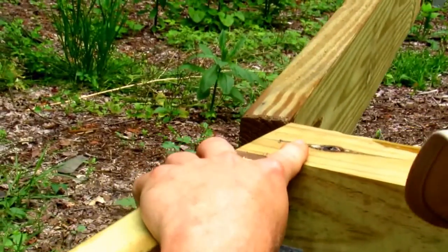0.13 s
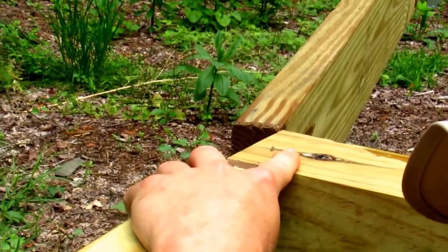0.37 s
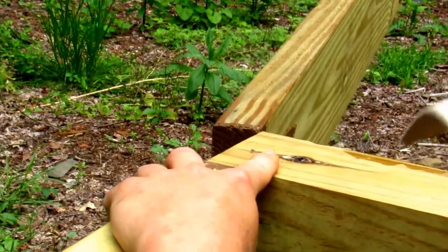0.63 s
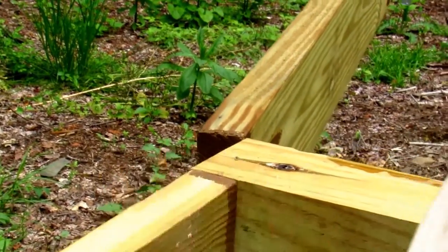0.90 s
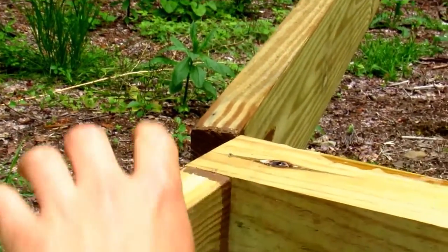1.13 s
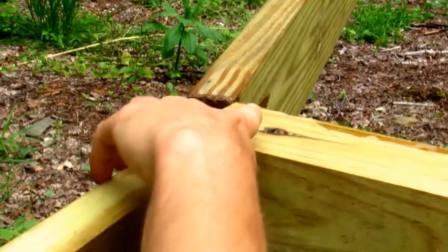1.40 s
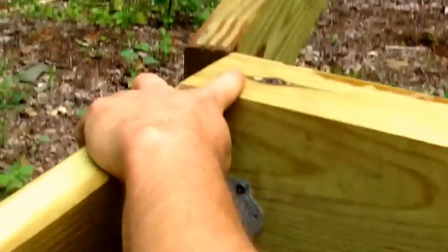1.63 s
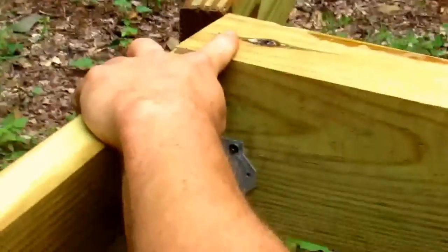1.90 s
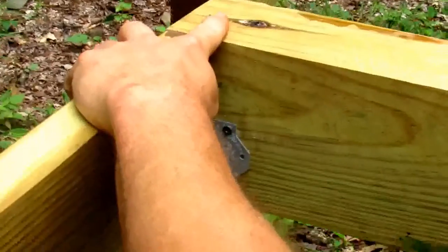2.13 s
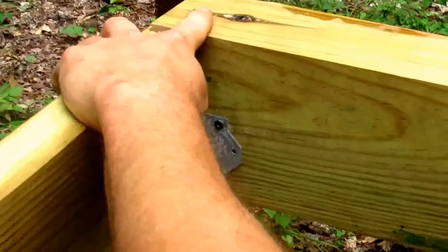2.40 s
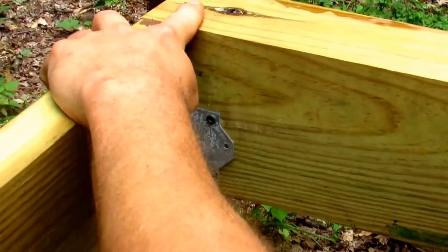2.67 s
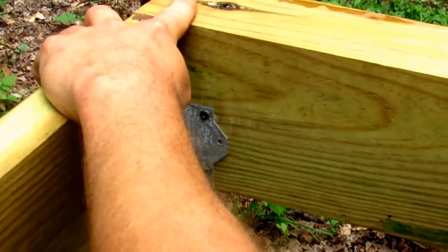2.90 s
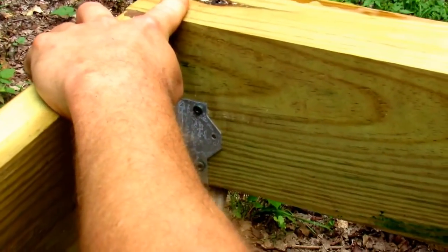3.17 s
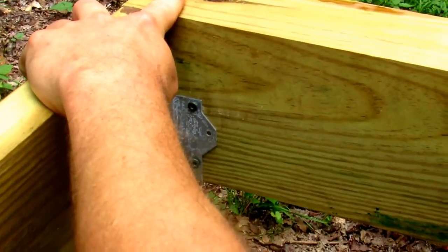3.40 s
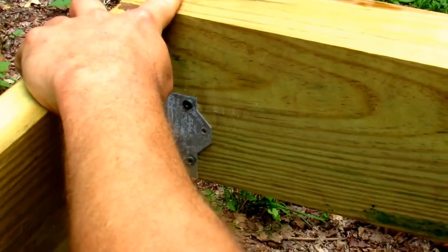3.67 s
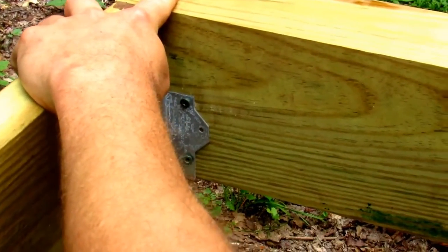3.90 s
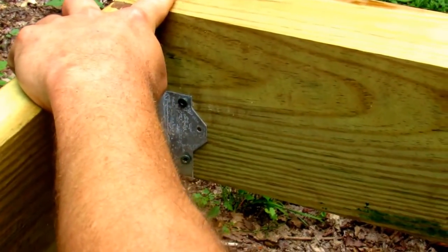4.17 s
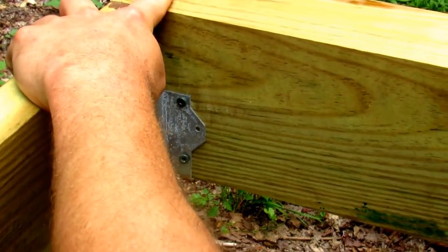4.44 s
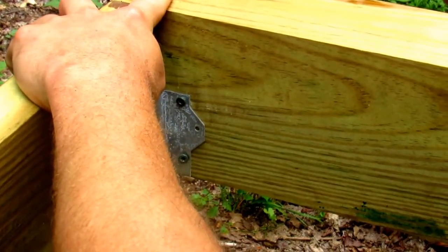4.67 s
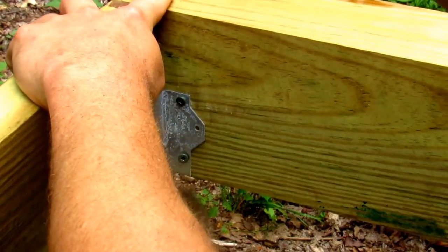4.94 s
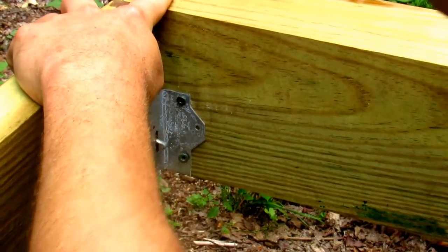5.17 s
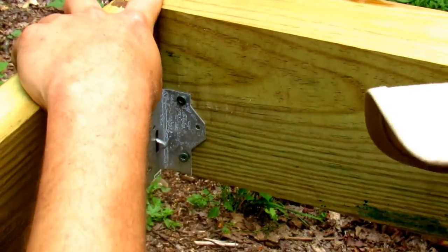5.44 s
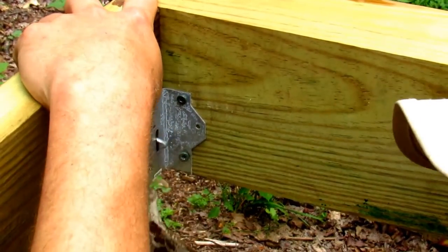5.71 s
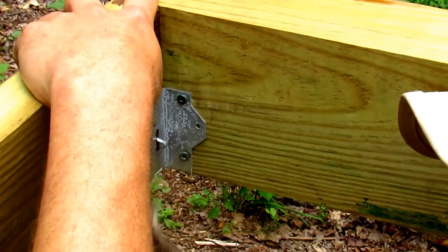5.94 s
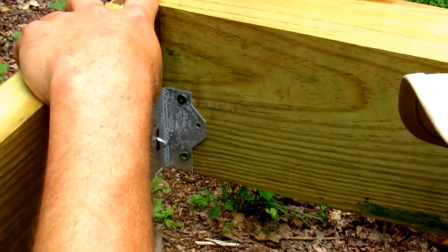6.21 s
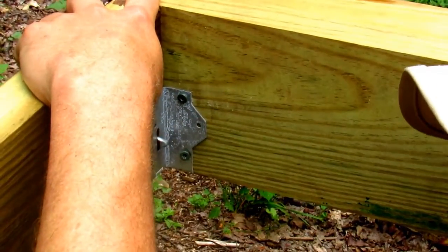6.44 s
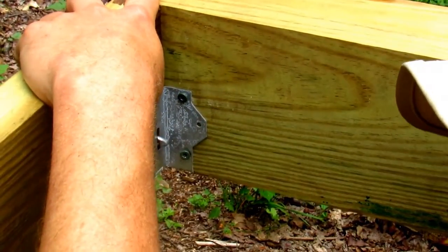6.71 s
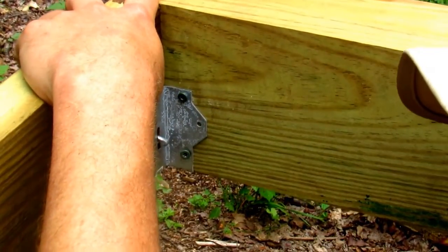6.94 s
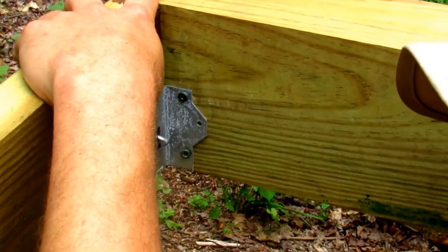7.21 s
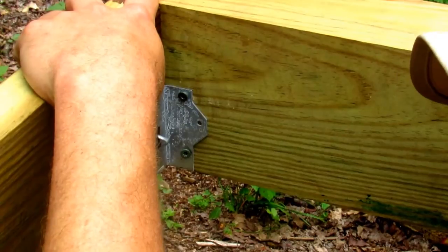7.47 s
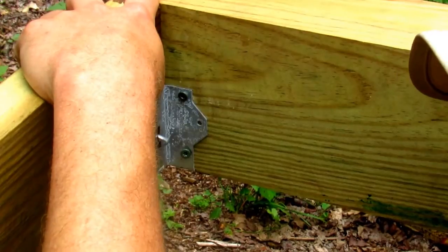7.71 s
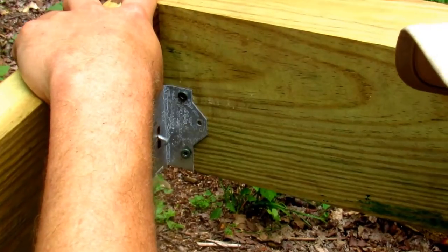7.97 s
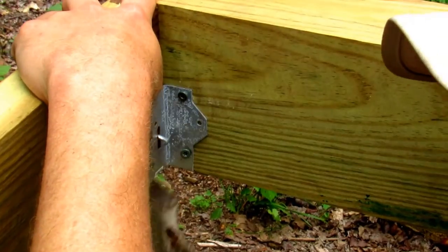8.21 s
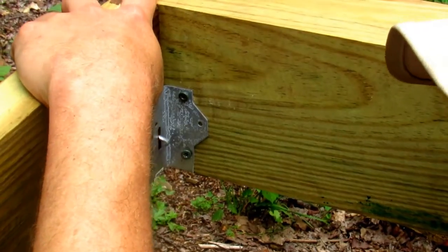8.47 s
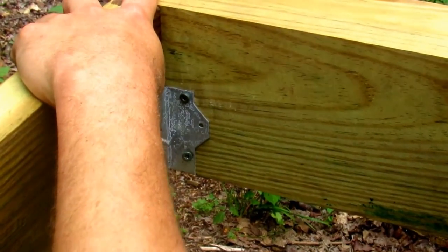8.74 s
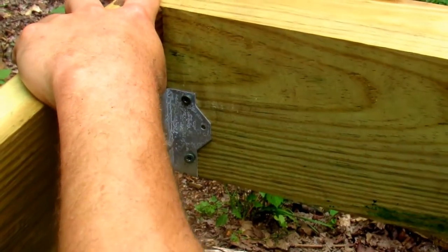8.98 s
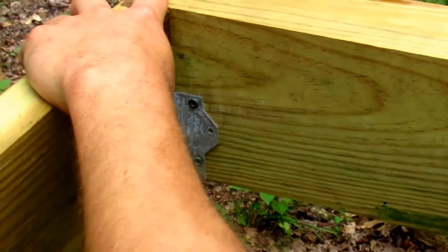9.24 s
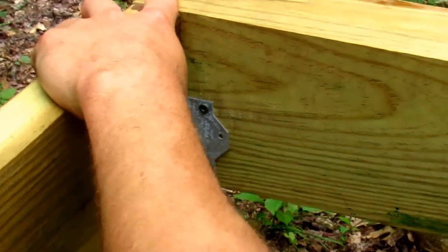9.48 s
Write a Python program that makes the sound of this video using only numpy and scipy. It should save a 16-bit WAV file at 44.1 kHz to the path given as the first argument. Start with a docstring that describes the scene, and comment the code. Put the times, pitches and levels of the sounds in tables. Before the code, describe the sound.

Axe-back blows crack on nail and bracket, wooden boards knocking and steel buzzing, while birds whistle faintly among windy trees.

```python
"""Sharp cracks come first: the back of an axe drives nails through a steel bracket into a timber frame outdoors.
Each blow sets board and steel modes ringing, bursts into noise bands and returns from the trees as a dull tail.
Birds sing further off as wavering near-sines, and a hand rustles as short gated noise.
Wind and hiss are noise bands, the distant hum is resonant noise and the thin whine a sine.
A close stereo pair overloads a little."""
import sys
import numpy as np
from scipy import signal
from scipy.io import wavfile

SR = 44100
rng = np.random.default_rng(int(sys.argv[2]) if len(sys.argv) > 2 else 0)


def field_ratio(decibels):
    """Amplitude ratio for a level in dB (20 dB per decade); scalars and array-likes work."""
    return 10 ** (np.asarray(decibels, dtype=float) / 20)


def wav_out(sig):
    """Save sig, one row per channel (or a flat mono array), as 16-bit PCM at SR to the path in sys.argv[1]."""
    wavfile.write(sys.argv[1], SR, np.round(np.clip(np.atleast_2d(sig).T, -1, 1) * 32767).astype(np.int16))


N = 423791

# hammer blows, relative levels: start_s, thud_db (100-600 Hz), clack_db (700-1800 Hz),
# crack_db (5-16 kHz), free_ring_db of the axe head
BLOWS = [(0.1037, -34.5, -23, -21.5, -63), (0.3709, -23.5, -18.5, -16.5, -37),
         (0.4409, -30.5, -25.5, -28, -60), (2.2914, -39, -23.5, -15, -51.5),
         (2.61, -40.5, -22.5, -15.5, -62), (2.8992, -31.5, -19, -17.5, -53.5),
         (3.187, -29, -18, -15, -59.5), (3.4737, -20.5, -12.5, -11, -51),
         (3.7564, -23, -11.5, -10.5, -54.5), (4.0315, -22.5, -11.5, -12.5, -60),
         (4.3109, -22, -14, -17, -52.5), (4.594, -22, -11.5, -12.5, -56.5),
         (4.8703, -21.5, -13.5, -17, -55), (5.7011, -24.5, -11, -16.5, -56),
         (5.9804, -25.5, -14.5, -23, -60), (6.2639, -23, -20.5, -19.5, -78), (6.55, -22, -18.5, -21.5, -64),
         (6.8303, -22, -17.5, -17, -49), (7.0982, -26, -11.5, -20.5, -63),
         (7.3802, -23, -18.5, -15.5, -56.5), (7.651, -22, -16.5, -19, -59),
         (7.9159, -22.5, -15.5, -19.5, -67.5), (8.189, -23, -28, -26.5, -71),
         (8.448, -23.5, -15, -17.5, -60)]
# the first nail seats, then the second nail begins: start_s
STAGES_S = [3.3, 5.4]


def rms_one(x):
    """Scale a signal to rms 1."""
    return x / np.sqrt(np.mean(x ** 2) + 1e-20)


def at_hz(table, hz):
    """Read the columns of a table on a log-frequency axis."""
    f, *columns = np.transpose(table)
    return [np.interp(np.log(hz), np.log(f), column) for column in columns]


def clicks(s, size):
    """Place an impulse of the given size at each time."""
    out = np.full(N, 1e-18)
    out[np.round(np.asarray(s) * SR).astype(int)] += size
    return out


def dying(x, t60):
    """Turn each impulse into an exponential envelope that falls 60 dB in t60 seconds."""
    return signal.lfilter([1], [1, -field_ratio(-60 / (max(t60, .002) * SR))], x)


def ring(x, hz, t60):
    """A two-pole resonance: a unit click sets a dying sine of height 1 ringing."""
    r = field_ratio(-60 / (t60 * SR))
    w = 2 * np.pi * hz / SR
    return signal.lfilter([0, np.sin(w)], [1, -2 * r * np.cos(w), r * r], x)


def drift(rate_hz):
    """A slow random curve of rms 1: low-passed noise drawn every 40 samples."""
    r = np.exp(-80 * np.pi * rate_hz / SR)
    noise = rng.standard_normal(N // 40 + 2002)
    slow = signal.lfilter([1], [1, -2 * r, r * r], noise)[2000:]   # skip the filter's start
    return np.interp(np.arange(N) / 40, np.arange(len(slow)), rms_one(slow))


def bands():
    """Third-octave noise bands: centre in Hz and two unrelated noises, jointly of rms 1."""
    white = rng.standard_normal((2, 2, N))
    edges = 40 * 2 ** np.arange(0, 8.9, 1 / 3)
    for k, (low, high) in enumerate(zip(edges, edges[1:])):
        band = signal.butter(2, [low, high], "band", fs=SR, output="sos")
        yield np.sqrt(low * high), rms_one(signal.sosfilt(band, white[k % 2]))


def blows():
    """Time, four-range colour and shake of each blow; knock and shake follow from the other levels."""
    # knock (1.8-5 kHz) above the mean of clack and crack, one per stage: level_db
    knock_over_db = [0.1, -0.86, 2]
    s, thud, clack, crack, _ = np.transpose(BLOWS)
    knock = (clack + crack) / 2 + np.array(knock_over_db)[np.searchsorted(STAGES_S, s)]
    # a thuddier blow shakes the bracket more, up to a limit (dB)
    shake = np.minimum(0.5 + 0.41 * (thud - clack), -1)
    return s, (thud, clack, knock, crack), shake


def colour_db(hz, colour):
    """Level of each hit at one frequency, read between its thud, clack, knock and crack."""
    corners = np.log([500, 800, 1500, 2200, 4500, 6000])
    return np.array([np.interp(np.log(hz), corners, [thud, clack, clack, knock, knock, crack])
                     for thud, clack, knock, crack in zip(*colour)])


def steel_spike():
    """Steel meets steel in full a moment after first touch: a sharp spike with brief high resonances follows
    each blow."""
    # modes of the spike: pitch_hz, level_db (relative), t60_s
    spike = [(2090, 3, 0.0033), (4100, -1, .007), (5100, 0, 0.0028), (6400, 2.5, 0.0016), (8830, 2, 0.0047),
             (11205, 3.5, 0.0032), (12860, 0.5, 0.0063), (14800, -5.5, 0.0049)]
    # sharp on the standing nail, blunter as the head meets the bracket, one per stage: level_db
    spike_stage_db = [0, -1.5, -4.5]
    late_s = .0008
    s, colour, _ = blows()
    stage_db = np.array(spike_stage_db)[np.searchsorted(STAGES_S, s)]
    out = np.zeros(N)
    for k, (hz, db, t60) in enumerate(spike):
        level_db = colour_db(hz, colour) + db + stage_db + rng.normal(0, 0.67, len(s))
        out += (-1) ** k * ring(clicks(s + late_s, field_ratio(level_db)), hz, t60)
    return out


def boards():
    """Every blow strikes all board modes; how far the nail is in sets their strengths."""
    # modes of the frame: pitch_hz, relative levels first_nail_standing_db, first_nail_seated_db,
    # second_nail_db, then t60_s
    board_modes = [(79.9, -12, -25, -26, 0.3), (113.4, -11.5, -17, -20, 0.26), (139, -11, -10, -11.5, 0.58),
                   (187, -2.5, -4.5, -6, 0.11), (235.3, -2.5, 0, -2.5, 0.22), (290, -8, -3.5, -6, 0.17),
                   (336.9, -2.5, -0.5, -0.5, 0.22), (367.4, -2.5, 4, 1.5, 0.17), (425, -0.5, -2, 4, 0.14),
                   (478, -11, -3, 2, 0.097), (529, -8.5, -3, -3.5, 0.15), (575.7, -11, 0.5, -4.5, 0.11),
                   (786, -9.5, -5, -15.5, .08), (911, -2.5, 1.5, -1, 0.073), (1017, -2, -4, 6.5, 0.06),
                   (1105, -11.5, -7, -5, 0.045), (1302, -9.5, -8, -3, 0.071), (1360, -2.5, -12, -7, 0.042),
                   (1614, -8.5, -13, -7.5, .06), (1745, -10, -13, -16.5, 0.054),
                   (2056, -9.5, -17.5, -8, 0.046), (2115, -15.5, -16, -12.5, 0.024),
                   (2393, -11.5, -17.5, -13, 0.056), (2650, -10.5, -13.5, -12.5, 0.019),
                   (3380, -16, -12.5, -20.5, 0.017)]
    # delay before the boards sound, one per stage: delay_s
    board_late_s = [.001, .001, .0003]
    detune = .025   # share of the pitch
    s, colour, _ = blows()
    stage = np.searchsorted(STAGES_S, s)
    out = np.zeros(N)
    for k, (hz, *stage_db, t60) in enumerate(board_modes):
        db = colour_db(hz, colour) + np.array(stage_db)[stage]
        db += rng.normal(0, 2.5, len(s))   # no two blows land on the same spot
        # bending waves need time to fill the board, the low ones longest
        late = np.array(board_late_s)[stage] + 0.23 / hz
        polarity = 1 if hz > 700 else (-1) ** k
        # each blow draws one of three slight detunings of the board pitches
        detuning = rng.integers(-1, 2, len(s))
        for shift in (-1, 0, 1):
            struck = clicks(s + late, field_ratio(db) * (detuning == shift))
            out += polarity * ring(struck, hz * (1 + shift * detune), t60)
    return out


def axe_head():
    """The head rings on as dying sines after it leaves the nail, until the next blow stops it."""
    # modes of the axe head: pitch_hz, level_db (relative), t60_s
    steel = [(5868, 0, .3), (7250, -12, .15), (11500, -8, .08)]
    t = np.arange(N) / SR
    s, *_, free_ring_db = np.transpose(BLOWS)
    last = np.maximum(np.searchsorted(s, t) - 1, 0)
    since = t - s[last]
    level_db = free_ring_db[last]
    modes = sum(field_ratio(level_db + db - 60 * since / t60) * np.sin(2 * np.pi * hz * since)
                for hz, db, t60 in steel)
    return modes * (since > 0)


def bracket():
    """The loose bracket buzzes on against the wood: dying noise in its modes, favoured anew each blow."""
    # modes of the bracket: pitch_hz, width_hz, level_db (relative), t60_s
    bracket_modes = [(1000, 100, -44.5, .8), (1300, 56, -43.5, 0.76), (2030, 140, -48.5, .7),
                     (6800, 200, -53.5, 0.47), (7200, 200, -50, 0.64), (8450, 200, -55, 0.58),
                     (9300, 250, -53, .5), (10400, 250, -52.5, 0.72), (12000, 250, -53.5, .4),
                     (12700, 250, -53, .35)]
    s, colour, shake = blows()
    out = np.zeros(N)
    for hz, width_hz, db, t60 in bracket_modes:
        favour_db = rng.normal(0, 4.5, len(s))
        level_db = colour_db(hz, colour) + shake * min(hz / 5000, 1) + db + favour_db
        shaken = clicks(s, field_ratio(level_db))
        buzz = rms_one(ring(rng.standard_normal(N), hz, np.log(1000) / (np.pi * width_hz)))
        out += buzz * (dying(shaken, t60) - dying(shaken, 0.024))   # the difference swells in softly
    return out


def blips():
    """Five small clicks after each blow ring briefly, perhaps the bracket settling on the wood."""
    s, (_, _, knock, _), _ = blows()
    late = rng.uniform(.05, .2, (len(s), 5))   # s after the blow
    spread_db = rng.normal(0, 4, (len(s), 5))
    size = field_ratio(knock[:, None] - 43 - 40 * late + spread_db)   # later ones weaker, by 40 dB per s
    out = np.zeros(N)
    for k, bend in enumerate(np.linspace(.9, 1.1, 5)):
        out += ring(clicks(s + late[:, k], size[:, k]), 2600 * bend, .015)
    return out


def tree_tail(shaken, tail_db, t60, bright):
    """The trees return a diffuse dying tail, and their nearest row answers as one soft lump."""
    tail = dying(shaken, t60) - dying(shaken, .06)
    answer = np.roll(dying(shaken, 0.19) - dying(shaken, 0.097), int(.095 * SR))   # 95 ms later
    return field_ratio(tail_db + 0.5 * drift(12)) * (tail + bright * answer)


def hand_rustle():
    """Level of a hand brushing wood and cloth: quick rises, straight falls and an uneven flutter."""
    # brushes: start_s, length_s, level_db (relative)
    rustles = [(1.001, 0.085, -61), (1.431, 0.091, -56), (1.677, 0.16, -56.5), (1.88, 0.023, -58),
               (1.958, .1, -55.5)]
    t = np.arange(N) / SR
    strokes = sum(field_ratio(db) * np.clip(np.minimum((t - start) / .01, 1 - (t - start) / length), 0, 1)
                  for start, length, db in rustles)
    return strokes * field_ratio(4.0 * drift(60) - 16)


def wind_and_air(hz, bright, wind_db, air_db, gust):
    """Level of the outdoor noise in one band: lumpy wind on the ports below, smooth far hiss above."""
    # spectrum of the outdoor noise: pitch_hz, level_db (relative, per Hz)
    air_spectrum = [(21, -45), (35, -7), (121, 6.5), (156, -10), (187, 3.5), (322, -8.5), (375, -0.5),
                    (567, -6.5), (679, -26.5), (753, -17.5), (974, -15.5), (1360, -22.5), (2950, -28),
                    (15400, -36.5), (16600, -44)]
    level_db = wind_db if hz < 650 else air_db + (1 - bright) * 11 + bright * 6.5
    windy = np.clip(1 - hz / 800, 0, 1)
    lumps_db = windy * (0.5 * gust + 2.5 * drift(19))
    band_db = at_hz(air_spectrum, hz)[0] + 10 * np.log10(hz) - 93.5
    return field_ratio(band_db + level_db + lumps_db)


def contact_and_air():
    """Shared noise bands carry the snap and rattle of hits, their tails, the rustles and the background."""
    # rebounds of the axe and touches on the frame, relative levels: start_s, knock_db, thud_db, crack_db
    rebounds = [(0.1869, -59, -34, -67.5), (0.3774, -8, -45, -11), (1.0161, -38.5, -53, -45.5),
                (1.6925, -38, -62, -47), (1.7672, -42, -51, -54), (1.8899, -38.5, -46, -63.5),
                (1.9684, -45, -48, -57), (2.6957, -35, -63, -63.5), (2.9834, -31.5, -37, -51),
                (3.256, -26, -54, -34), (3.5438, -32, -43, -37.5), (4.0934, -50, -44, -40.5),
                (4.2244, -41, -37, -52), (4.3794, -34.5, -59, -46.5), (4.6593, -37, -50, -43.5),
                (4.9404, -30.5, -60, -47.5), (4.999, -38, -47, -47), (5.113, -45, -32.5, -50),
                (5.2039, -45, -43, -68), (6.908, -42, -48, -47.5), (6.9311, -37, -50, -53),
                (7.7405, -30.5, -62, -50), (8.2874, -41.5, -55, -71), (8.8059, -51, -56, -68)]
    # contact noise, relative levels: pitch_hz, snap_db, snap_t60_s, rattle_db, rattle_t60_s,
    # tail_db from the trees, tail_t60_s
    contact = [(81.5, -28, .05, -21.5, .3, -36.5, 0.92), (302, -10, 0.04, -7.5, 0.27, -31, 1),
               (1030, -10.5, .02, -11.5, .12, -43.5, 0.78), (1250, -9.5, .02, -15.5, 0.14, -43, 0.59),
               (1620, -10.5, 0.015, -25, 0.11, -52.5, 0.13), (2700, -12.5, 0.0071, -20, 0.059, -46, 0.16),
               (4500, -6, 0.0068, -18, 0.044, -50.5, 0.77), (7000, -8, 0.0088, -17, 0.055, -55, 1.1),
               (10800, -7.5, 0.0061, -13.5, 0.037, -43, 0.25), (13700, -11, 0.0057, -18.5, .04, -46.5, .3),
               (16000, -16.5, .008, -27, .04, -50.5, .3)]
    # left-right likeness of the outdoor noise: pitch_hz, correlation (-1 to 1)
    likeness = [(60, -0.47), (150, -0.61), (380, -0.5), (950, -0.27), (2380, 0.64), (5980, 0.7),
                (15000, 0.25)]
    s, colour, shake = blows()
    tick_s, tick_knock, tick_thud, tick_crack = np.transpose(rebounds)
    tick_colour = (tick_thud, (tick_thud + tick_knock) / 2 - 4, tick_knock - 8, tick_crack)
    wind_db, air_db = background_db()
    rustle = hand_rustle()
    gust = drift(3)
    chatter = field_ratio(0.5 * drift(150))   # the bracket touches and lets go in lumps
    near, far = np.zeros(N), np.zeros((2, N))
    for hz, (mid, side) in bands():
        snap_db, snap_t60, rattle_db, rattle_t60, tail_db, tail_t60 = at_hz(contact, hz)
        bright = np.clip(np.log2(hz / 2000) / 2, 0, 1)
        hit_db = colour_db(hz, colour)
        hits = clicks(s, field_ratio(hit_db))
        ticks = clicks(tick_s, field_ratio(colour_db(hz, tick_colour)))

        snap = field_ratio(snap_db) * dying(hits + field_ratio(1.5) * ticks, snap_t60)
        rattle = field_ratio(rattle_db) * dying(hits, rattle_t60) * chatter
        rise = 1 - np.exp(-1 / (SR * (0.001 + 0.43 / hz)))   # low bands speak more slowly
        struck = signal.lfilter([rise], [1, rise - 1], snap + rattle)
        struck = struck + rustle * (hz > 1500)
        near += mid * struck

        uneven_db = rng.normal(0, 2.5, len(s))   # each tail has a colour of its own
        shaken = clicks(s, field_ratio(hit_db + shake * np.clip(hz / 5000, 0, 1) + uneven_db))
        tail = tree_tail(shaken, tail_db, tail_t60, bright)
        floor = wind_and_air(hz, bright, wind_db, air_db, gust)
        alike = np.clip(at_hz(likeness, hz)[0], -.9, .95)
        wide = floor * np.sqrt((1 - alike) / (1 + alike))
        wide = wide + .45 * tail + .22 * struck * (hz > 1500)
        # reversed noise is unrelated to the hits; the side noise enters the two ports in opposite polarity
        far += mid[::-1] * (floor + tail) + side * wide * [[1], [-1]]
    return near, far


def bird_echoes(song):
    """Echoes among the trees: dying noise, mostly common to both sides, smears the song."""
    t = np.arange(SR // 2) / SR
    echoes = rng.standard_normal(len(t)) + 0.19 * rng.standard_normal((2, len(t)))
    echoes *= field_ratio(-33.5 - 60 * t / .6) * (t > .012)   # t60 of 0.6 s, from 12 ms on
    return signal.fftconvolve(song[None], echoes, axes=1)[:, :N]


def birds():
    """Gliding near-sines that waver in level, with echoes from the trees."""
    # falling whistle of the first bird: time_s into the note, pitch_hz, level_db (relative)
    whistle = [(0, 5043, -15.5), (.012, 5197, 1.5), (.02, 4552, -1.5), (.034, 4100, 2), (0.066, 3592, -3.5),
               (.095, 3180, -12.5), (0.114, 3050, -31.5)]
    # phrases of that whistle: start_s, notes (count), spacing_s, level_db (relative)
    phrases = [(.962, 4, .1635, -62.5), (2.765, 3, .162, -65), (5.921, 2, .309, -77), (7.34, 1, .16, -71.5),
               (9.27, 3, .151, -74)]
    # short notes of other birds: start_s, length_s, from_hz, to_hz, level_db (relative)
    short_notes = [(0.795, 0.061, 3700, 4500, -74), (.85, 0.12, 4500, 5100, -72),
                   (.845, .02, 3496, 2900, -71), (1.213, .07, 3470, 2476, -67),
                   (1.273, 0.078, 2000, 3540, -69), (1.35, .08, 2607, 3010, -69),
                   (1.744, 0.033, 3070, 2800, -61), (1.81, 0.023, 2673, 3290, -65),
                   (1.838, 0.024, 2820, 2800, -67), (2.09, 0.022, 2800, 3375, -65),
                   (2.11, 0.04, 3450, 3230, -60.5), (2.14, 0.069, 2693, 2650, -64),
                   (2.87, 0.018, 3770, 3270, -59), (5.46, 0.08, 1687, 1786, -69),
                   (5.475, .06, 3400, 3210, -73.5), (5.619, .035, 2700, 3950, -69.5),
                   (5.66, 0.04, 3930, 4000, -71), (8.947, 0.043, 3820, 3540, -74),
                   (9.012, 0.035, 4600, 4320, -75), (9.074, 0.044, 3590, 2790, -76),
                   (9.125, 0.037, 2978, 3600, -69), (9.16, 0.04, 2580, 2200, -78),
                   (9.453, 0.046, 3040, 3410, -76)]
    # swell at the start, one fifth, four fifths and end of a short note: level_db
    note_swell_db = [-8.5, -2.5, -2, -15.5]
    songs = [(s + k * spacing, db, whistle)
             for s, notes, spacing, db in phrases for k in range(round(notes))]
    share = np.array([0, 1, 4, 5]) / 5
    for s, length, from_hz, to_hz, db in short_notes:
        glide_hz = from_hz + share * (to_hz - from_hz)
        songs.append((s, db, np.transpose([share * length, glide_hz, note_swell_db])))
    out = np.zeros(N + SR)
    for s, db, shape in songs:
        into, hz, swell_db = np.transpose(shape)
        t = np.arange(int(into[-1] * SR)) / SR
        tone = np.sin(2 * np.pi * np.cumsum(np.interp(t, into, hz)) / SR)
        out[int(s * SR):][:len(t)] += field_ratio(db + np.interp(t, into, swell_db)) * tone
    song = out[:N] * field_ratio(4.5 * drift(60))
    return song + bird_echoes(song)


def background_db():
    """Curves of the wind level and of the air, hum and whine level over time."""
    # background level over time: time_s, wind_db, air_db (also hum and whine), relative
    background = [(0, 10.5, 1), (.09, 6, -2), (.65, -2, -1.5), (.94, 4.5, -1.5), (1.2, 4, 0),
                  (1.92, 8, 2.5), (2.27, 8, 2), (5.251, -3, -3.5), (5.6, -1, -6.5), (8.85, -17, -9),
                  (9.09, -5, -12), (9.6, -3.5, -9)]
    s, *levels = np.transpose(background)
    return [np.interp(np.arange(N) / SR, s, db) for db in levels]


def hum():
    """Distant hum, noise twice through a narrow resonance, with a thin electrical whine, a sine."""
    hum_hz, width_hz, whine_hz = 477.9, 15, 15735
    t60 = np.log(1000) / (np.pi * width_hz)
    tone = rms_one(ring(ring(rng.standard_normal(N), hum_hz, t60), hum_hz, t60))
    whine = np.sin(2 * np.pi * whine_hz * np.arange(N) / SR) * field_ratio(-87 + 1.5 * drift(8))
    return (tone * field_ratio(-63) + whine) * field_ratio(background_db()[1])


def scene():
    """Work close on the right: the left port gets less of its bass, the right a little less top treble."""
    near, far = contact_and_air()
    near = near + boards() + steel_spike() + axe_head() + bracket() + blips()
    # the close sound carries no deep bass
    near = signal.sosfilt(signal.butter(4, 92, "high", fs=SR, output="sos"), near)
    r = np.exp(-2 * np.pi * 900 / SR)   # 900 Hz corner
    left = near - 0.9 * signal.lfilter([1 - r], [1, -r], near)
    right = signal.lfilter([.7, .3], [1], near)
    work = np.array([left, right]) * field_ratio([[1.0], [1.5]])
    total = work + far + hum() * field_ratio([[-5], [3]]) + birds()
    # the bounce off the ground cancels most of one narrow range
    dip_hz, dip_width_hz, dip_share = 686, 310, 0.83
    dip = signal.lfilter(*signal.iirpeak(dip_hz, dip_hz / dip_width_hz, fs=SR), total)
    return total - dip_share * dip


def band_limit(x):
    """A steep low-pass at the top of the band."""
    return signal.sosfilt(signal.butter(12, 16770, fs=SR, output="sos"), x)


def record(dry):
    """The microphone loses deep bass and the top, its housing resonates and the loudest peaks clip."""
    # resonances of the housing: pitch_hz, width_hz, share added (ratio)
    housing = [(2700, 750, 0.52), (6240, 2000, 0.33), (7640, 310, 0.096), (9800, 1200, 0.22),
               (11700, 160, 0.27)]
    x = signal.sosfilt(signal.butter(2, 45, "high", fs=SR, output="sos"), dry)
    x = signal.sosfilt(signal.butter(8, 16500, fs=SR, output="sos"), x)
    for hz, width_hz, share in housing:
        x = x + share * signal.lfilter(*signal.iirpeak(hz, hz / width_hz, fs=SR), x)
    return band_limit(np.clip(x, -1, 1))


dry = scene()
out = record(dry)
wav_out(out)
```